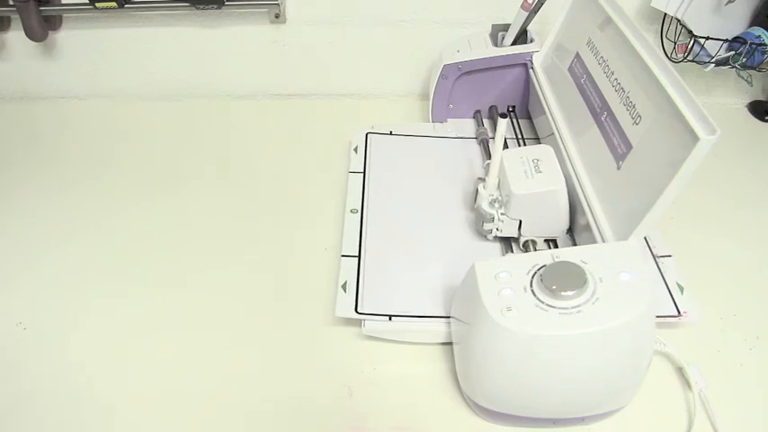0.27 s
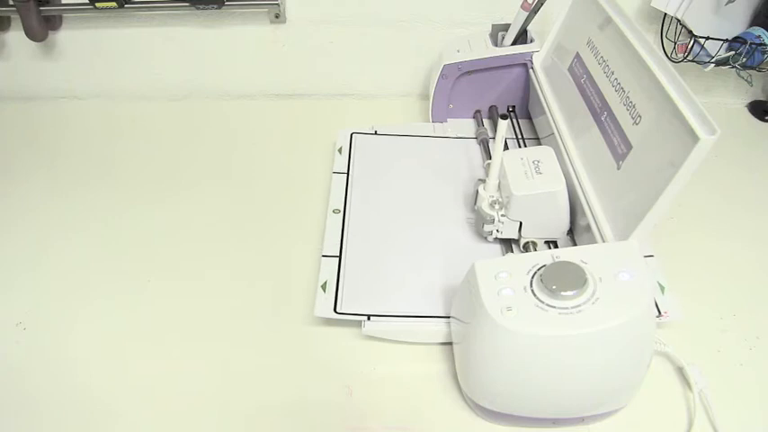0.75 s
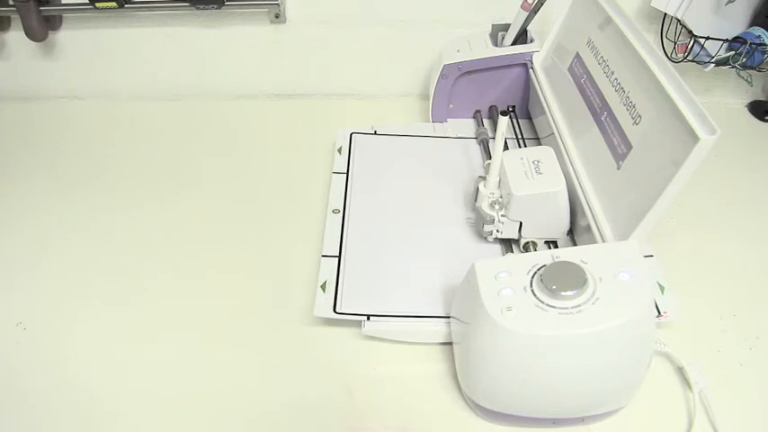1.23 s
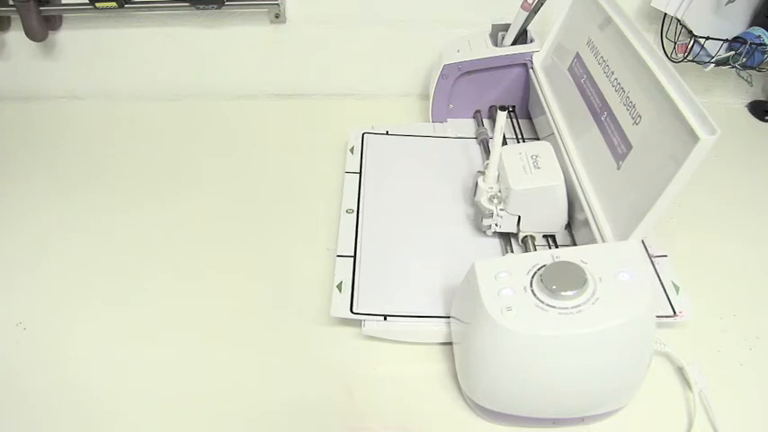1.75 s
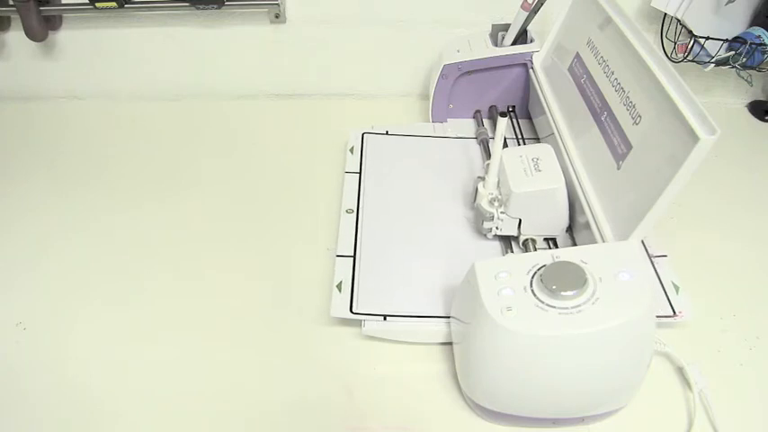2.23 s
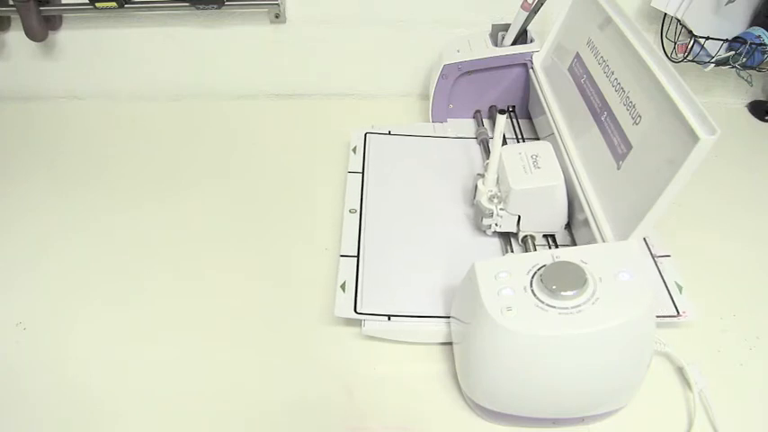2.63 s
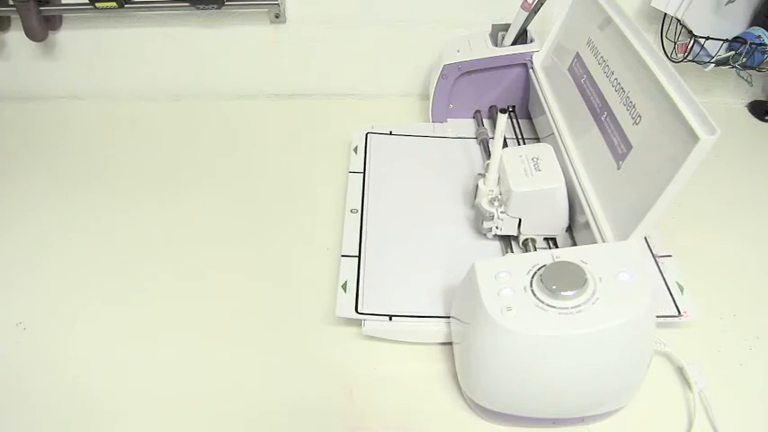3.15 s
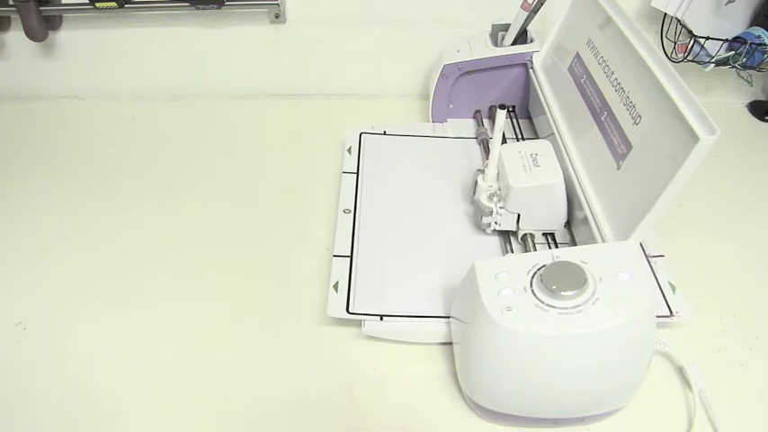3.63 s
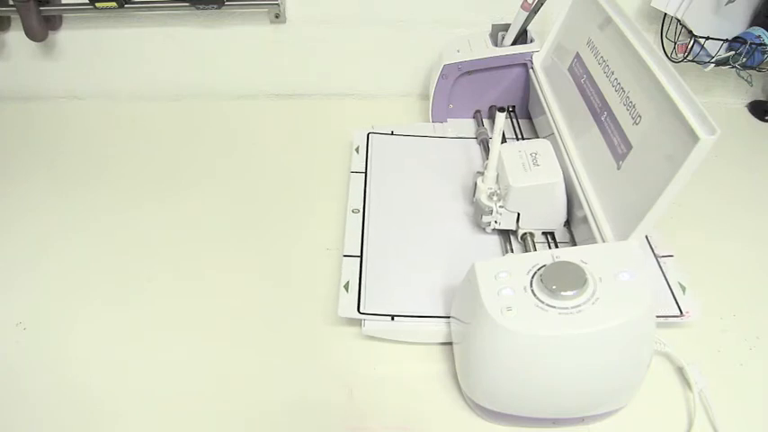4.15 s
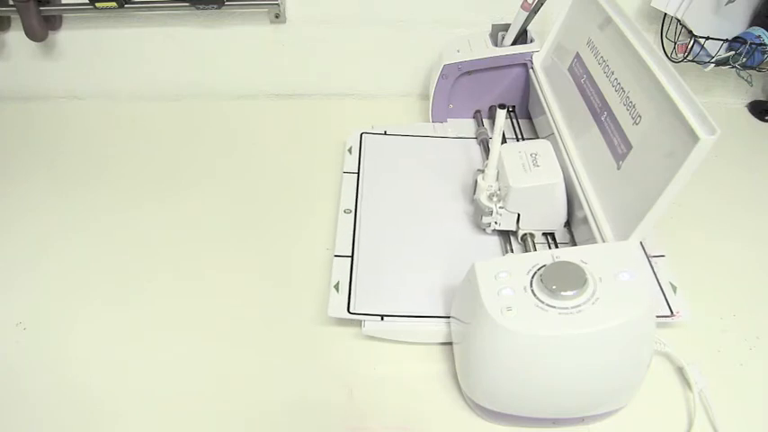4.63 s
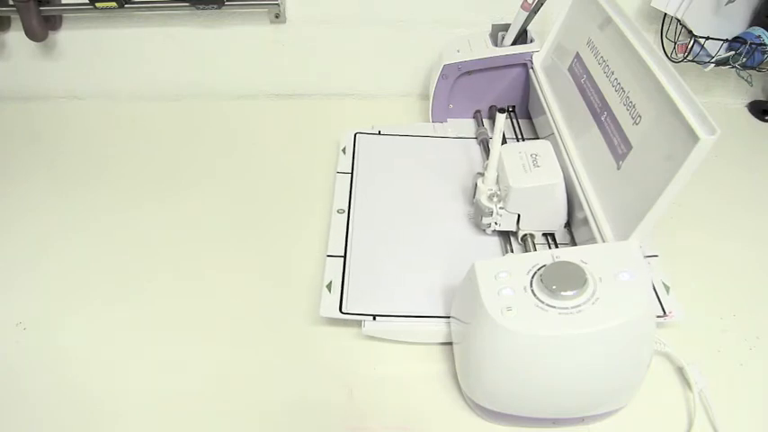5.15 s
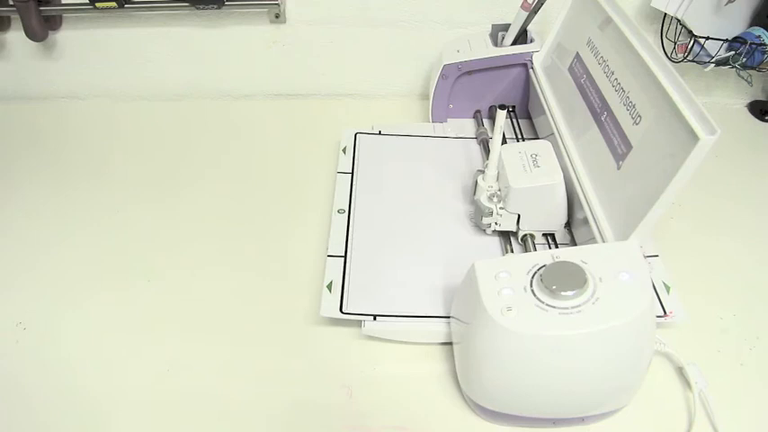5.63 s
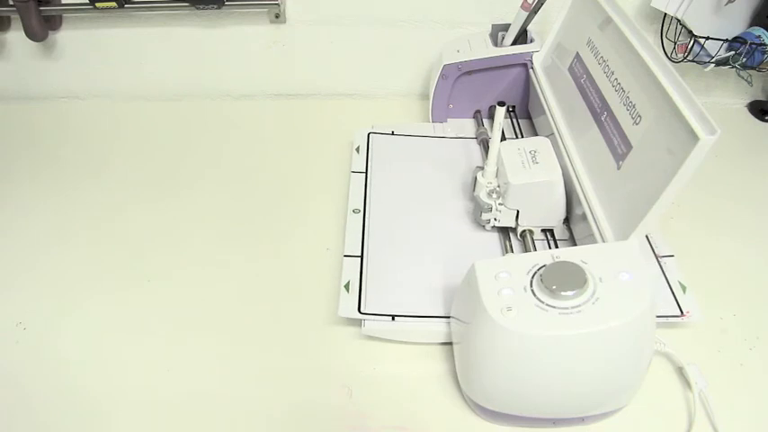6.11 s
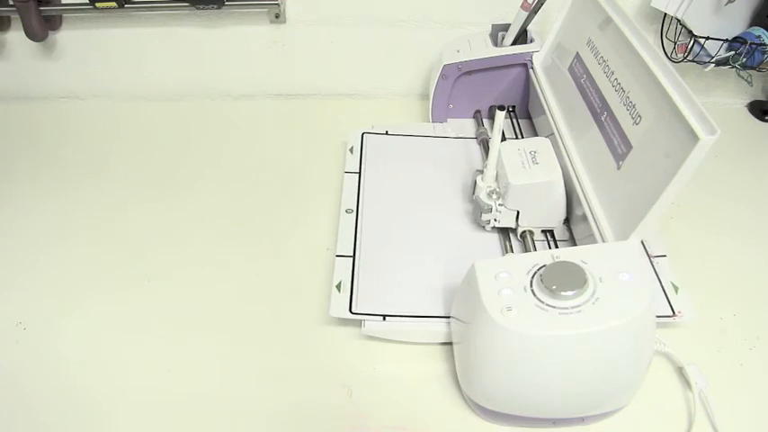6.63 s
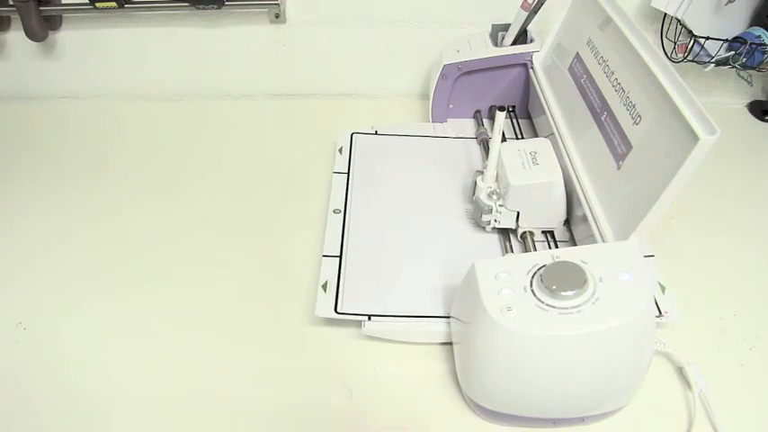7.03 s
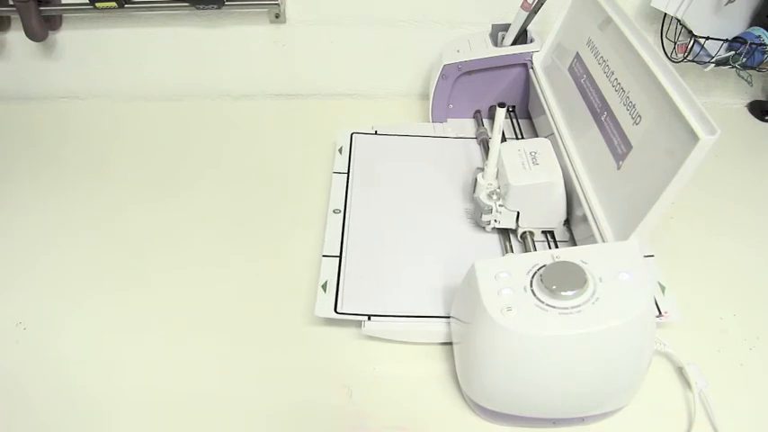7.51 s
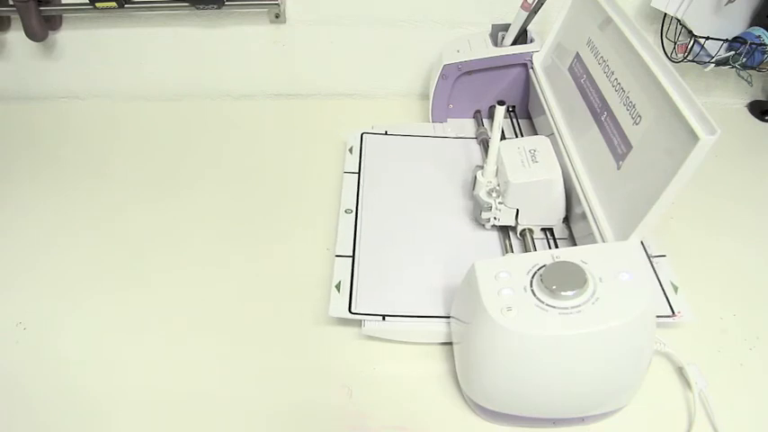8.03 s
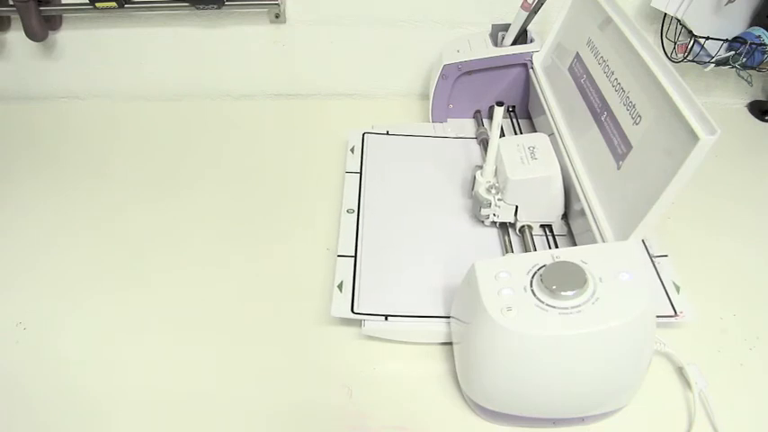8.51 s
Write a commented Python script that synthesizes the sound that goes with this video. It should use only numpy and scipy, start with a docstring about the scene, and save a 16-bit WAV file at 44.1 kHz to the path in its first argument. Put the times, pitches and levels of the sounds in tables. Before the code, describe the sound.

Short stop-start motor whirs and sharp pen clacks over the low gear grind of a craft cutting machine, close in a small room.

```python
"""Cutting machine drawing on a table

A small room, one microphone close to a craft cutting machine that draws with a pen. Two geared motors
feed the mat and drive the carriage: they crawl while drawing and whir in short fast strokes.
A solenoid, singing at its drive frequency, drops and lifts the pen with sharp clacks.
The table top booms underneath; behind it all lie faint room tone and a thin electronic whistle."""
import sys
import numpy as np
from scipy import signal
from scipy.fft import rfft, irfft, next_fast_len
from scipy.io import wavfile
from scipy.ndimage import map_coordinates

SR = 44100
rng = np.random.default_rng(int(sys.argv[2]) if len(sys.argv) > 2 else 0)


def transcribe(signal):
    """Save signal, clipped to [-1, 1], as a 16-bit WAV file at the path in sys.argv[1]."""
    frames = np.atleast_2d(signal).T
    limited = np.clip(frames, -1, 1)
    pcm = np.round(limited * 32767).astype(np.int16)
    wavfile.write(sys.argv[1], SR, pcm)


N = 386316

# fast strokes of the feed rollers: start t/s, time until braking t/s, level/dB, tooth rate f/Hz
FEED_STROKES = [(.03, 0.078, -42.5, 345.4), (.28, 0.4, -32.5, 375.2), (1.405, 0.33, -34, 381.5),
                (2.125, 0.12, -39.5, 372), (2.3, 0.07, -34.5, 352), (2.51, 0.22, -32, 373.7),
                (3.495, 0.2, -33, 346.5), (3.965, 0.16, -33.5, 372.4), (4.48, .34, -31, 414.3),
                (6.53, 0.38, -31.5, 373.7), (8.24, 0.079, -38.5, 344), (8.47, 0.19, -33.5, 373.8)]
# roller gear tones, at usual and at top speed: multiple of the shaft rate, level/dB
FEED_TONES = [(5, -3), (11, -14), (22, -10), (27, -10.5), (31, -9), (33, 1.5), (35, -19), (42, -8.5),
              (44, -5), (55, -15)]
FEED_TOP_TONES = [(4, -9.5), (11, -7), (15, -5), (22, -6), (25, -9), (33, -8), (34, -4), (35, -15),
                  (37, -6), (43, -5)]
# spectra of the rattling teeth and the sliding mat: f/Hz, level/dB
FEED_TEETH = [(40, -26), (130, -17), (230, -19), (400, -4), (650, -5.5), (780, -1), (980, -11), (1120, 5),
              (1300, -5.5), (1490, 2), (1950, -11.5), (2250, -8), (3200, -17), (4500, -21)]
MAT_HISS = [(3000, -2), (5000, -3.5), (7500, -11), (9700, -3), (13000, -18), (16000, -20)]
def feed(top_speed_hz=400, cutoff_hz=4800):
    """The geared rollers whir and the mat hisses over its guides."""
    out = np.zeros(N)
    for s, length, db, mesh_hz in FEED_STROKES:
        orders = FEED_TOP_TONES if mesh_hz > top_speed_hz else FEED_TONES
        whir, level = motor_stroke(length, db, mesh_hz, orders, FEED_TEETH, tone_db=-3.5,
                                   rattle_db=-1.5, hunt=0.0035, bite=0.31, flutter_db=2.5, jitter=0.01)
        whir = filtered(whir, lambda hz: 1 / (1 + (hz / cutoff_hz) ** 4))
        hiss = coloured(rng.standard_normal(len(level)), MAT_HISS)
        add(out, s, whir + amp(-19.5) * level * hiss)
    return out


# fast strokes of the carriage: start t/s, time until braking t/s, level/dB, tooth rate f/Hz
CARRIAGE_STROKES = [(1.405, 0.33, -31, 388.5), (2.52, .2, -32.5, 384.4), (3.965, 0.14, -31, 393.5),
                    (5.775, 0.31, -28.5, 396.6), (7.595, .24, -29.5, 400.6), (8.43, 0.21, -32.5, 392)]
# carriage gear tones: multiple of the shaft rate, level/dB
CARRIAGE_TONES = [(5, -9.5), (11, -7), (15, -8.5), (22, -2.5), (26, -16), (34, -18), (35, -9.5), (38, -5),
                  (44, -3), (53, -20), (54, -13), (55, 1.5), (56, -3.5), (57, -7), (58, -15), (60, -15)]
# spectra of the rattling teeth and of dry rubbing: f/Hz, level/dB
CARRIAGE_TEETH = [(40, -24), (140, -3), (310, -5), (450, 0.5), (670, -8), (800, -5), (1150, 1),
                  (1750, -5.5), (2020, 3), (2650, -10), (3400, -16), (4300, -15), (5800, -28), (7100, -27),
                  (9000, -38), (16000, -38)]
FRICTION = [(1500, -26), (2700, 7), (3500, -8), (4500, 3.5), (5500, -5), (6500, -4.5), (8000, -14),
            (11500, -16), (16000, -32)]
def carriage():
    """The carriage gear buzzes, brighter than the rollers, and the slide rasps along its rails."""
    out = np.zeros(N)
    for s, length, db, mesh_hz in CARRIAGE_STROKES:
        buzz, level = motor_stroke(length, db, mesh_hz, CARRIAGE_TONES, CARRIAGE_TEETH, tone_db=-4,
                                   rattle_db=0.5, hunt=0.0026, bite=0.22, flutter_db=3, jitter=0.009)
        size = len(level)
        roughness = amp(2.6 * wobble(302, size) + 2.5 * wobble(36, size))
        rasp = coloured(roughness * rng.standard_normal(size), FRICTION)
        slide = amp(-20.5) * rasp + amp(-26.5) * ticking(size, rate=24)
        add(out, s, buzz + level * slide)
    return out


TEETH = 11
RUN_UP_S, RUN_UP_DB, BRAKE_DB_PER_S, RUN_OUT_S = .05, 9.5, 175, .2
ENGAGE_S = 0.018  # a motor takes hold, and lets go, over this time
def motor_stroke(length, db, mesh_hz, orders, spectrum, tone_db, rattle_db,
                 hunt, bite, flutter_db, jitter):
    """A geared motor runs up, holds and brakes. Returns its tones plus rattle, and their envelope."""
    t = np.arange(int((length + RUN_OUT_S) * SR)) / SR
    size = len(t)
    swell_db = -RUN_UP_DB * np.maximum(1 - t / RUN_UP_S, 0) - BRAKE_DB_PER_S * np.maximum(t - length, 0)
    level = amp(db + swell_db) * np.clip(np.minimum(t, t[-1] - t) / ENGAGE_S, 0, 1)
    # the motor spins up quickly, then the servo hunts slightly about its set speed
    speed = (1 - 0.3013 * np.exp(-t / 0.01405)) * (1 + hunt * wobble(35.7, size))
    turns = np.cumsum(speed) * mesh_hz / TEETH / SR
    tones = np.zeros(size)
    for k, line_db in orders:  # play between the teeth roughens the tones, the high ones most
        gain = amp(line_db + flutter_db * wobble(44.5, size))
        phase = 2 * np.pi * (k * turns + rng.random())
        tones += gain * np.sin(phase + k * jitter * wobble(110.3, size))
    # teeth rattle as they mesh, harder once in each turn of the shaft
    meshing = bite * np.cos(2 * np.pi * TEETH * turns) + 0.055 * np.cos(2 * np.pi * turns)
    contact = np.exp(meshing + 0.21 * wobble(146.6, size))
    rattle = coloured(contact * rng.standard_normal(size), spectrum)
    # the tones sink into the rattle at both ends of the stroke
    return level * (amp(tone_db + 0.38 * swell_db) * tones + amp(rattle_db) * rattle), level


# pen drops: t/s, blow level/dB, settling level/dB
PEN_DROPS = [(1.999, -21, -39), (3.748, -22.5, -27.5), (5.017, -21, -26), (6.345, -21, -28.5),
             (8.110, -21, -22.5)]
# pen lifts: t/s, blow level/dB, rebound level/dB, thud level/dB
PEN_LIFTS = [(1.057, -22, -30, -46), (3.135, -23.5, -30.5, -43), (4.409, -23, -31.5, -40),
             (5.432, -23, -29, -38), (7.245, -23, -28.5, -45)]
# spectra of a sharp tick, the pen landing, the arm's hollow settling, its stop: f/Hz, level/dB
SHARP_TICK = [(200, -38), (1500, -14), (3000, -5.5), (5500, -1), (8000, 1.5), (11000, 0.5), (16000, -14)]
PEN_LANDING = [(24, -41), (40, -32), (109, 1.5), (276, -23), (433, 3), (896, -8), (1120, 2.5),
               (1630, -13.5), (2000, -6.5), (2910, -3.5), (3740, -14.5), (4340, -5), (5720, -14),
               (9940, -11), (16000, -33)]
ARM_SETTLING = [(50, -37), (125, 16.5), (250, -7), (500, -11), (900, 0.5), (1300, 2.5), (1700, -1.5),
                (2300, -9.5), (4000, -22), (9000, -26), (16000, -36)]
ARM_STOP = [(24, -45), (40, -40), (243, -1.5), (455, -0.5), (646, -4.5), (1120, 3), (1630, -10.5),
            (2000, -7), (2210, -6.5), (2500, -2.5), (3740, -9.5), (4130, -4.5), (5180, -9), (9450, -11.5),
            (16000, -27)]
def pen_solenoid(land_s=.0105, settle_s=.091, rebound_s=.061):
    """Down: the armature ticks, the pen lands, the arm settles. Up: it hits its stop and rebounds."""
    clacks, song = np.zeros(N), np.zeros(N)
    for s, blow_db, settle_db in PEN_DROPS:
        add(clacks, s, blow(blow_db + 0.6, SHARP_TICK, hold=0.0053, t60=0.11, ring_db=-19))
        add(clacks, s + land_s, blow(blow_db, PEN_LANDING, hold=0.015, t60=0.12, ring_db=-9))
        add(clacks, s + settle_s, blow(settle_db, ARM_SETTLING, hold=0.0071, t60=0.091, ring_db=-14))
        add(song, s + .002, coil(length=0.086, db=-31.5))
    for s, blow_db, rebound_db, thud_db in PEN_LIFTS:
        add(clacks, s, blow(blow_db, ARM_STOP, hold=0.0068, t60=0.13, ring_db=-6))
        add(clacks, s + rebound_s, blow(rebound_db, ARM_STOP, hold=0.018, t60=0.058, ring_db=-9))
        add(clacks, s + rebound_s, thud(thud_db))
        add(song, s - .019, coil(length=0.081, db=-30))
    return room(clacks, wet_db=-8) + room(song, wet_db=-13)


# modes of the pen arm and the case: f/Hz, level/dB, 60 dB decay t/s
CASE_MODES = [(129.4, -7.5, 0.61), (252.8, -2, 0.32), (385, -4.5, 0.19), (448.7, 1.5, 0.18),
              (536, -14, .16), (780, 0, 0.28), (996, -11, 0.12), (1084, 3, 0.17), (1230, -2, 0.27),
              (1297, -4, 0.099), (1370, -25, .14)]
def blow(db, spectrum, hold, t60, ring_db):
    """Loose plastic parts chatter and die away; the case rings a little differently each time."""
    t = np.arange(SR // 2) / SR
    chatter = coloured(rng.standard_normal(len(t)), spectrum)
    chatter *= amp(-60 * np.maximum(t - hold, 0) / t60 + 0.85 * wobble(517, len(t)))
    ring = np.zeros(len(t))
    for hz, mode_db, mode_t60 in CASE_MODES:
        decay = amp(ring_db + mode_db + rng.normal(0, 1.5) - 60 * t / mode_t60)
        ring += decay * np.sin(2 * np.pi * (hz * t + rng.random()) + .9 * wobble(60, len(t)))
    return amp(db) * (chatter * (1 - np.exp(-t / 0.00052)) + ring * (1 - np.exp(-t / 0.013)))


def coil(length, db, drive_hz=2002):
    """The pulsed drive makes the solenoid sing, unsteadily, louder as the current builds."""
    t = np.arange(int(length * SR)) / SR
    phase = 2 * np.pi * drive_hz * t + .2 * wobble(200, len(t))
    current = 1 - .65 * np.exp(-t / .025)
    tone = np.sin(phase) + current * (amp(-6.5) * np.sin(2 * phase) + amp(-17) * np.sin(3 * phase))
    gate = np.clip(np.minimum(t, length - t) / 0.002, 0, 1)
    return amp(db + 1.2 * wobble(98, len(t))) * current * tone * gate


def thud(db, hz=59, t60=0.35):
    """The machine rocks on its feet."""
    t = np.arange(SR // 2) / SR
    return amp(db - 60 * t / t60) * (1 - np.exp(-t / 0.014)) * np.sin(2 * np.pi * hz * t)


# gear tones at drawing speed: multiple of the shaft rate, level/dB
CRAWL_TONES = [(5, -2), (8, 0.5), (11, -0.5), (15, 0), (22, -6), (38, -3), (44, -4)]
def crawl(shaft_hz=31, case_hz=130):
    """At drawing speed the gears grind and whine faintly, their speed wandering."""
    turns = np.cumsum(shaft_hz * np.exp(.09 * wobble(5, N))) / SR
    whine = np.zeros(N)
    for k, db in CRAWL_TONES:
        whine += amp(db + 4 * wobble(14, N)) * np.sin(2 * np.pi * k * turns + .5 * wobble(70, N))
    case_hum = filtered(rng.standard_normal(N), lambda hz: 1 / (1 + ((hz - case_hz) / 5) ** 2))
    return (amp(-1) * grind() + amp(-5.5) * unit(whine) + amp(-11.5) * unit(case_hum)) * gear_load()


# spectrum of the slowly turning gears: f/Hz, level/dB
GEAR_RUMBLE = [(35, -25), (90, 1), (150, 3.5), (220, -1), (420, 2.5), (600, -3), (980, -9.5), (1400, -2),
               (1900, -17.5), (2500, -12), (3200, -24), (5000, -26.5), (9000, -37.5), (16000, -37)]
def grind():
    """The load on the gears catches and slips many times a second."""
    return coloured(amp(1.7 * wobble(160, N)) * rng.standard_normal(N), GEAR_RUMBLE)


CRAWL_DB, WANDER_DB = -40.5, 1.3
LANDING_DB, LANDING_S = 8.5, 0.11  # the crawl is louder as the pen lands, then eases
OVERRUN_S, STOP_DB_PER_S = 0.085, 210  # it lasts a moment after the pen lifts, then dies away
def gear_load():
    """Envelope of the crawl: it runs while the pen is down, and whenever the rollers feed."""
    t = np.arange(N) / SR
    drops, lifts = [row[0] for row in PEN_DROPS], [row[0] for row in PEN_LIFTS]
    # the pen is already down at the start
    drawing = [(down, up + OVERRUN_S) for down, up in zip([-1] + drops, lifts + [N / SR])]
    feeding = [(s, s + length) for s, length, *_ in FEED_STROKES]
    runs = [np.clip((t - on) / 0.019, 0, 1) * amp(-STOP_DB_PER_S * np.maximum(t - off, 0))
            for on, off in drawing + feeding]
    landing = sum((t > s) * np.exp(-np.abs(t - s) / LANDING_S) for s in drops)
    return np.max(runs, axis=0) * amp(CRAWL_DB + LANDING_DB * landing + WANDER_DB * wobble(6, N))


# knocks as the motors start or turn, and ticks of loose plastic: t/s, level/dB
GEAR_KNOCKS = [(1.406, -30.5), (2.16, -36), (2.187, -32), (2.336, -40), (2.468, -30), (2.822, -28),
               (3.484, -35), (5.775, -38.5), (7.178, -36), (7.593, -31), (7.625, -28.5), (8.408, -21.5)]
PLASTIC_TICKS = [(1.651, -35), (3.49, -41.5), (3.685, -39), (4.078, -46), (6.069, -46), (7.78, -42),
                 (7.815, -45)]
# spectrum of a knock: f/Hz, level/dB
KNOCK_SPECTRUM = [(50, -34), (130, 15.5), (500, -2.5), (1300, 8), (2100, -0.5), (3200, -7), (6000, -16.5),
                  (10000, -32), (16000, -30)]
def backlash():
    """Slack in the gears is taken up with a knock, and loose parts tick."""
    out = np.zeros(N)
    for s, db in GEAR_KNOCKS:
        add(out, s, blow(db, KNOCK_SPECTRUM, hold=0.0036, t60=0.13, ring_db=-8))
    for s, db in PLASTIC_TICKS:
        add(out, s, blow(db, SHARP_TICK, hold=0.00061, t60=0.029, ring_db=-41))
    return room(out, wet_db=-5)


# short dry scrapes: start t/s, length t/s, level/dB
SHORT_SCRAPES = [(2.151, 0.053, -37.5), (2.314, 0.12, -54), (2.818, 0.084, -46), (3.491, 0.043, -46),
                 (3.588, 0.043, -42), (3.665, 0.051, -38.5)]
def scrapes():
    """Short dry scrapes and squeaks as the machine moves."""
    out = np.zeros(N)
    for s, length, db in SHORT_SCRAPES:
        size = int(length * SR)
        rough = amp(2.2 * wobble(310, size)) * rng.standard_normal(size)
        add(out, s, amp(db) * np.sin(np.linspace(0, np.pi, size)) * coloured(rough, FRICTION))
    return room(out, wet_db=-6.5)


# peaks and dips of the table under the machine: centre f/Hz, width f/Hz, level/dB
TABLE_BANDS = [(63, 6.9, 5.5), (81.4, 5.2, -5.5), (96, 6, 1), (110, 10.3, -8), (122.3, 3.7, 4.5),
               (199, 5.6, -7), (241, 6.3, 1), (327, 15, -2.5), (454.5, 14, 3.5), (676, 16, -2.5),
               (1430, 7.5, 7)]
def table_top(x):
    """The table top lifts some low notes and swallows others."""
    return filtered(x, lambda hz: amp(sum(db / (1 + ((hz - centre) / width) ** 2)
                                          for centre, width, db in TABLE_BANDS)))


# reverberation of the small room: f/Hz, 60 dB decay t/s
ROOM_DECAY = [(100, 0.28), (500, 0.36), (2000, 0.4), (6000, 0.36), (15000, 0.15)]
def room(x, wet_db):
    """The direct sound at the microphone and, 5 ms later, the room's tail, whose top dies first."""
    hz, t, noise = signal.stft(rng.standard_normal(SR // 2), SR, nperseg=256)
    tail = signal.istft(noise * amp(-60 * t / along(ROOM_DECAY, hz)[:, None]), SR, nperseg=256)[1]
    tail = np.pad(tail / np.linalg.norm(tail), (SR // 200, 0))
    return x + amp(wet_db) * signal.fftconvolve(x, tail)[:N]


# spectrum of the quiet room: f/Hz, level/dB
ROOM_TONE = [(25, -32), (60, 0), (140, -1.5), (200, 2.5), (300, -9), (750, -6), (1060, -10.5), (1480, 0.5),
             (1860, -13.5), (3700, -18), (5500, -18), (6600, -25.5), (11000, -29.5), (15500, -32)]
def background(whistle_hz=15628):
    """Room tone, faint ticking and a thin, steady electronic whistle."""
    whistle = np.sin(2 * np.pi * whistle_hz * np.arange(N) / SR)
    hush = amp(-52) * coloured(rng.standard_normal(N), ROOM_TONE) + amp(-67) * ticking(N, rate=31)
    return hush + amp(-57 + .8 * wobble(30, N)) * whistle


def ticking(size, rate):
    """Random tiny ticks of uneven size, about rate a second, at rms 1."""
    taps = (rng.random(size) < rate / SR) * amp(5.5 * rng.standard_normal(size))
    decay = signal.lfilter([1], [1, -np.exp(-1 / (0.0093 * SR))], taps)
    return coloured(decay * rng.standard_normal(size), SHARP_TICK)


def amp(db):
    """Decibels to gain."""
    return 10 ** (np.asarray(db) / 20)


def unit(x):
    """Scale to rms 1."""
    return x / np.sqrt(np.mean(x ** 2) + 1e-20)


def along(points, hz):
    """Interpolate (f/Hz, value) points on a log axis."""
    freqs, values = np.transpose(points)
    return np.interp(np.log(hz + 1), np.log(freqs + 1), values)


def wobble(rate, size):
    """A smooth random curve, rate knots a second."""
    knots = rng.standard_normal(int(size * rate / SR) + 4)
    return map_coordinates(knots, [np.arange(size) * rate / SR])


def filtered(x, gain):
    """x times a gain that depends on frequency."""
    size = next_fast_len(len(x) + 8192)
    return irfft(rfft(x, size) * gain(np.fft.rfftfreq(size, 1 / SR)), size)[:len(x)]


def coloured(x, spectrum):
    """x shaped by the spectrum, subsonics rolled off, at rms 1."""
    return unit(filtered(x, lambda hz: amp(along(spectrum, hz)) * hz ** 2 / (hz ** 2 + 30 ** 2)))


def add(track, s, sound):
    """Mix a sound into the track at time s."""
    start = max(round(s * SR), 0)
    part = track[start:start + len(sound)]
    part += sound[:len(part)]


def scene():
    """The machine on its table, close up and in mono, with the room behind it."""
    machine = feed() + carriage() + crawl() + pen_solenoid() + scrapes() + backlash()
    return (table_top(machine) + background())[None]


TOP_HZ = 16300
def record(dry):
    """The camera keeps nothing above its band limit."""
    return np.array([filtered(channel, lambda hz: hz < TOP_HZ) for channel in dry])


dry = scene()
out = record(dry)
transcribe(out)
```